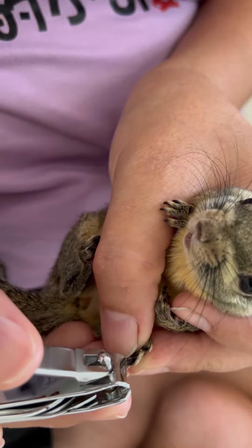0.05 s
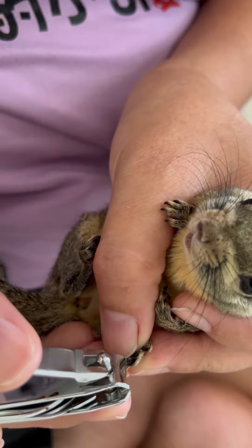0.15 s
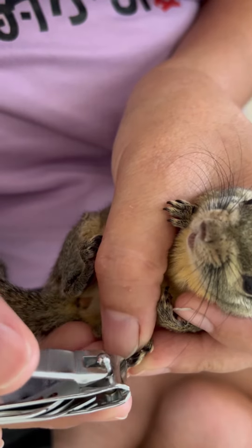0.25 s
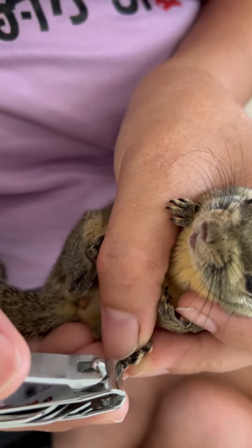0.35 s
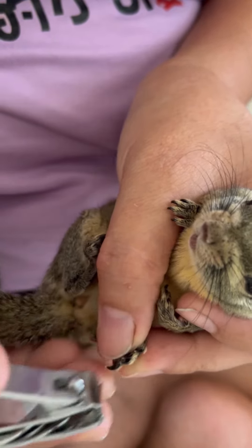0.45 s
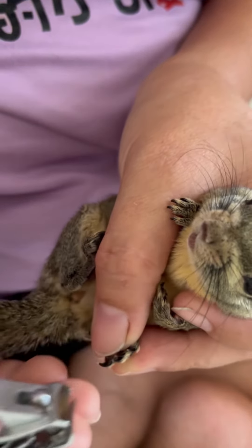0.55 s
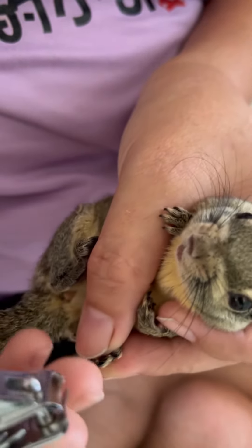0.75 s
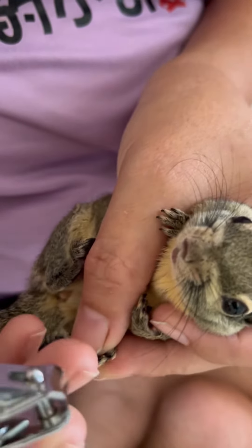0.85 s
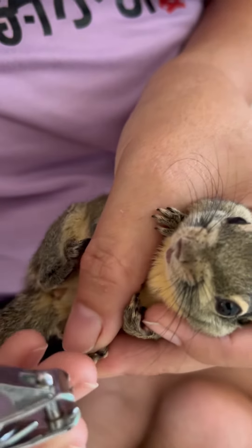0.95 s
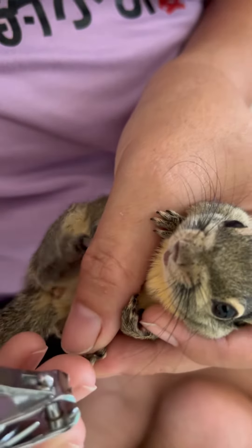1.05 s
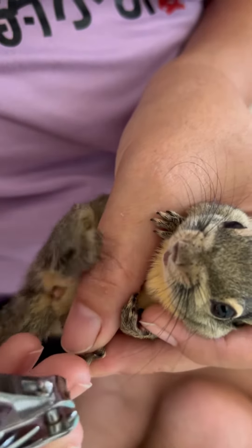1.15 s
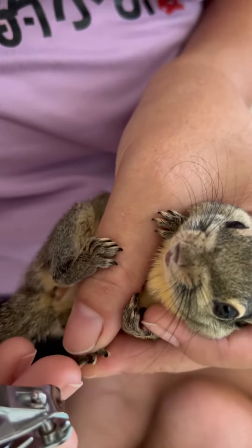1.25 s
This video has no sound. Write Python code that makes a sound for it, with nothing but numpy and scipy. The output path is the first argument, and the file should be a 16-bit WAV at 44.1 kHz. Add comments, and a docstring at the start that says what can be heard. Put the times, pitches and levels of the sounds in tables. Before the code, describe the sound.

One sharp, close click of a steel nail clipper cutting a tiny claw.

```python
"""Nail clipper on a small claw

A steel clipper snaps once through a small claw, close to the microphone in a quiet room.
The jaws tick faintly as they take hold; the claw breaks in a quick run of contacts that ring the
hand-damped steel. Fingers brush the clipper, and a short bright room tail dies away over a bed
of low rumble, faint hum and soft hiss."""
import sys
import numpy as np
from scipy import signal
from scipy.fft import rfft, irfft
from scipy.io import wavfile

SR = 44100
rng = np.random.default_rng(int(sys.argv[2]) if len(sys.argv) > 2 else 0)


def transcribe(signal):
    """Save signal, clipped to [-1, 1], as a 16-bit WAV file at the path in sys.argv[1]."""
    frames = np.atleast_2d(signal).T
    limited = np.clip(frames, -1, 1)
    pcm = np.round(limited * 32767).astype(np.int16)
    wavfile.write(sys.argv[1], SR, pcm)


N = 57330

# contacts within the snap: t/s, level/dB
CONTACTS = [(.24203, 0.5), (.24291, -11.5), (.24351, -12.5), (.24473, -16.5), (.245, -19)]
# clipper modes; the last three, faint ones escape the hand's damping:
# f/Hz, level/dB, t60/s, left minus right/dB
STEEL_MODES = [(1840, -13.5, 0.0084, -0.5), (2093, -17, .0065, -1), (2827, -22.5, 0.013, -10),
               (3190, -24, 0.02214, -8.5), (4275, -18, 0.011, -3.5), (4612, -14.5, .0125, -7),
               (5460, -6, .0075, 2), (6040, -8, .0083, -0.3), (6915, -6, .0109, .5),
               (7600, -20.5, .024, -0.5), (8290, -23.5, .022, 0.5), (9037, -25.5, .0145, 0.5),
               (9963, -19, .0147, 0.9), (10751, -16.5, 0.01, 0.2), (12040, -11.5, .008, .4),
               (13825, -15, .0085, 0.5), (15199, -12, .0034, 0.3), (2993, -57, 0.32, -3),
               (6950, -54.5, .52, 0), (11920, -53.5, .19, -0.5)]
# jaws taking hold of the claw: t/s, level/dB
JAW_TICKS = [(0.1488, 0.5), (.2062, -10), (.211, -2)]
# fingers shifting on the clipper: peak t/s, half-width/s, level/dB
FINGER_RUBS = [(.18, .06, -80), (0.683, 0.15, -82.5)]
# EQ of anything scraping on the steel: f/Hz, level/dB
SCRAPE_EQ = [(3000, -10.5), (5500, -2.5), (7000, 2), (9000, -6), (13500, -5.5), (15000, -14), (16000, -35)]
# EQ of the room tail: f/Hz, level/dB
TAIL_EQ = [(900, -31.5), (1500, -21.5), (1950, -11.5), (2350, -19), (2750, -9), (3200, -5.5), (3750, -7.5),
           (4300, -7), (4900, -6), (5600, -4.5), (6400, -1.5), (6900, 0), (7700, -11.5), (8300, -10.5),
           (8700, -12), (9700, -3.5), (10500, -10), (12200, -4.5), (13000, -14.5), (13700, -11),
           (14600, -11.5), (15700, -44.5)]
# EQ of the steady room tone: f/Hz, level/dB
ROOM_TONE_EQ = [(20, -28.5), (55, -4.5), (80, -6.5), (140, -1.5), (200, -4), (265, -8.5), (320, -18),
                (420, -21.5), (620, -20.5), (900, -26), (1500, -30.5), (2500, -34), (4500, -34.5),
                (5700, -38), (7000, -47), (9000, -50), (12500, -51.5), (16000, -71.5)]
# balance of the room tone: f/Hz, left minus right/dB
ROOM_TONE_PAN = [(60, 1), (250, 1.5), (700, 3.5), (3000, 0)]
# low hum tones: f/Hz, rms level/dB
HUM_TONES = [(98, -65), (135, -68), (152, -65)]
# swells of the faint whine above the hum: t/s, rms level/dB
WHINE_SWELLS = [(0, -96), (.2, -82), (.4, -87.5), (.8, -85), (.98, -80), (1.045, -75.5), (1.085, -86),
                (1.19, -89), (1.3, -72)]
# stereo width and left lead by frequency: f/Hz, left lead/ms, left-right likeness/0-1
STEREO_IMAGE = [(153.4, 0.011, .98), (320, 0.0018, .86), (700, 0.0049, 0), (1510, 0.051, 0.8),
                (2700, .075, 0), (3120, .125, .2), (4373, 0.29, .25), (5600, .269, 0.7), (6900, 0.27, .85),
                (7700, .258, 1), (10000, .25, 1), (14500, .238, .9)]

SNAP_DB, RING_RISE_S = -11, .000186
RADIATE_HZ = 1860  # the small steel radiates little below this pitch
CRACK_TRIM_DB, CRACK_T60_S, CRACK_LOW_HZ = -37.5, .015, 900
TICK_DB, TICK_T60_S = -66, .014
TAIL_DB, PREDELAY_S = -48.5, .003
TAIL_T60_S, TREBLE_T60_S, CROSSOVER_HZ = .57, .32, 9000
ROOM_TONE_DB, WHINE_HZ = -55.5, 616.3
WAVER_DEPTH, WAVER_HZ = .5, 3.8
HIGH_CUT_HZ = 16600
TIME = np.arange(N) / SR
FREQS = np.fft.rfftfreq(2 * N, 1 / SR)


def snap():
    """Each contact rings the steel, neighbouring modes in opposite polarity, and cracks the claw."""
    steel = sum((-1) ** k * undb(hit_db + mode_db) * pan(lean_db) * steel_ring(start, hz, t60)
                for start, hit_db in CONTACTS
                for k, (hz, mode_db, t60, lean_db) in enumerate(STEEL_MODES))
    steel = highpass(steel, RADIATE_HZ, order=8)
    crack = highpass(noise_bursts(CONTACTS, CRACK_T60_S), CRACK_LOW_HZ, order=4)
    return undb(SNAP_DB) * (steel + undb(CRACK_TRIM_DB) * crack)


def steel_ring(start, hz, t60):
    """One mode of the clipper, pushed into motion and dying away."""
    age = np.maximum(TIME - start, 0)
    attack = 1 - np.exp(-age / RING_RISE_S)
    return attack * decay(start, t60) * np.sin(2 * np.pi * hz * age)


def jaw_ticks():
    """Tiny bright scrapes as the jaws grip the claw."""
    colour = undb(curve(SCRAPE_EQ))
    colour /= np.sqrt(np.mean(colour ** 2))
    return undb(TICK_DB) * equalise(noise_bursts(JAW_TICKS, TICK_T60_S), colour)


def finger_rubs():
    """Soft swells of skin sliding on steel."""
    friction = equalise(rng.standard_normal(N), undb(curve(SCRAPE_EQ)))
    swells = sum(undb(db) * np.exp(-((TIME - peak) / width) ** 2) for peak, width, db in FINGER_RUBS)
    return swells * friction / friction.std()


def room_tail():
    """The walls answer the snap with a diffuse wash of noise whose treble dies sooner."""
    wash = equalise(stereo_noise(), undb(curve(TAIL_EQ)))
    wash = undb(TAIL_DB) * wash / wash.std()
    crossover = curve([(CROSSOVER_HZ / np.sqrt(2), 0), (CROSSOVER_HZ * np.sqrt(2), 1)])
    treble = equalise(wash, crossover)
    start = CONTACTS[0][0] + PREDELAY_S
    return (wash - treble) * decay(start, TAIL_T60_S) + treble * decay(start, TREBLE_T60_S)


def room_tone():
    """A steady bed of low rumble and soft hiss, leaning a little left."""
    bed = equalise(stereo_noise(), undb(curve(ROOM_TONE_EQ)) * pan(curve(ROOM_TONE_PAN)))
    return undb(ROOM_TONE_DB) * bed / bed.std()


def hum():
    """Three low wavering tones, and a faint whine that swells now and then."""
    low = sum(undb(db) * wavering_tone(hz) for hz, db in HUM_TONES)
    whine_db = np.interp(TIME, *np.array(WHINE_SWELLS).T)
    return low + undb(whine_db) * wavering_tone(WHINE_HZ)


def wavering_tone(hz):
    """A tone of unit rms that drifts slowly in level and phase."""
    drift = equalise(rng.standard_normal((2, N)), curve([(WAVER_HZ, 1), (WAVER_HZ * 2, 0)]))
    drift = WAVER_DEPTH * drift / drift.std()
    carrier = np.exp(2j * np.pi * (hz * TIME + rng.random()))
    tone = np.real((1 + drift[0] + 1j * drift[1]) * carrier)
    return tone / tone.std()


def stereo_noise():
    """Stereo white noise, nearly mono in the bass and the treble."""
    likeness = np.clip(curve(STEREO_IMAGE, column=2), 0, 1)
    mid = equalise(rng.standard_normal(N), np.sqrt((1 + likeness) / 2))
    side = equalise(rng.standard_normal(N), np.sqrt((1 - likeness) / 2))
    return np.array([mid + side, mid - side])


def noise_bursts(hits, t60):
    """A decaying burst of white noise on each hit."""
    return rng.standard_normal(N) * sum(undb(db) * decay(start, t60) for start, db in hits)


def decay(start, t60):
    """Envelope with an instant attack and an exponential release."""
    age = TIME - start
    gate = np.clip(age * SR + 1, 0, 1)
    return gate * np.exp(-np.log(1000) * np.maximum(age, 0) / t60)


def undb(db):
    """Decibels to gain."""
    return 10 ** (np.asarray(db) / 20)


def pan(db):
    """Left and right gains for a level difference."""
    return undb(np.array([[1], [-1]]) * db / 2)


def curve(table, column=1):
    """A table column drawn across the spectrum on a log frequency axis."""
    rows = np.array(table, float)
    return np.interp(np.log(FREQS + 1), np.log(rows[:, 0]), rows[:, column])


def equalise(x, gain):
    """Filter by a gain for each frequency."""
    return irfft(rfft(x, 2 * N) * gain)[..., :N]


def highpass(x, hz, order):
    """Steep low cut."""
    return signal.sosfilt(signal.butter(order, hz, "high", fs=SR, output="sos"), x)


def scene():
    """Clipper, room and background in stereo; the treble leads slightly on the left."""
    left, right = snap() + jaw_ticks() + finger_rubs() + room_tail() + room_tone() + hum()
    lag_s = curve(STEREO_IMAGE) / 1000
    late_right = equalise(right, np.exp(-2j * np.pi * FREQS * lag_s))
    return np.array([left, late_right])


def record(dry):
    """A steep high cut takes the very top off the mix."""
    return signal.sosfilt(signal.ellip(8, .2, 70, HIGH_CUT_HZ, fs=SR, output="sos"), dry)


dry = scene()
out = record(dry)
transcribe(out)
```